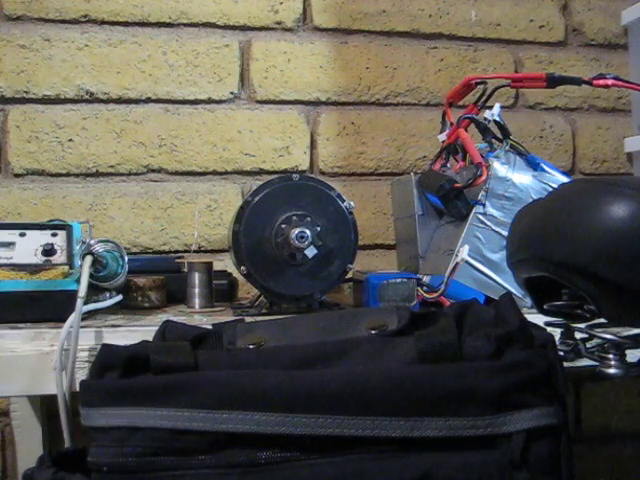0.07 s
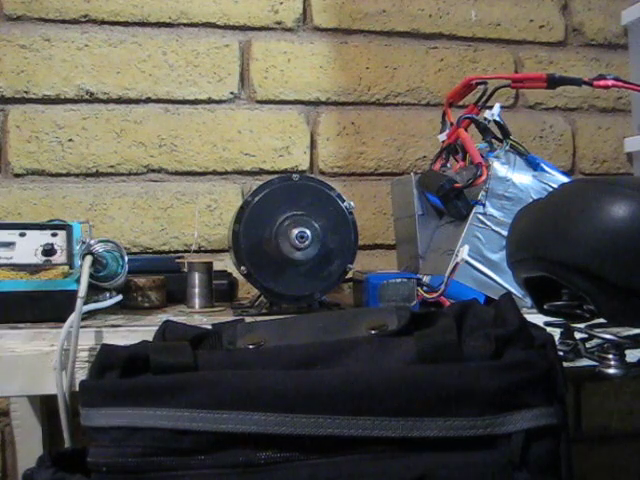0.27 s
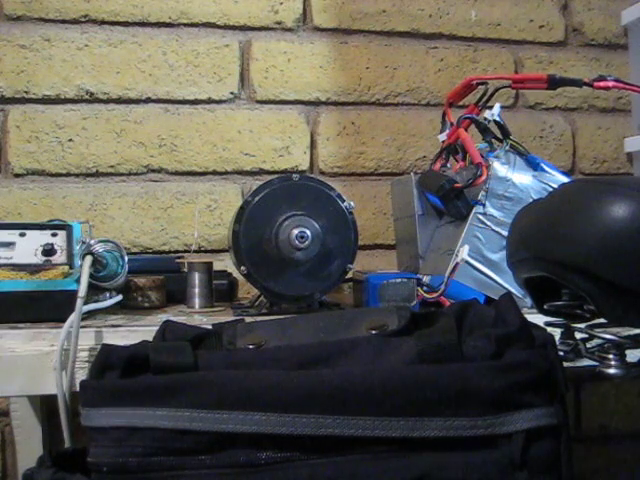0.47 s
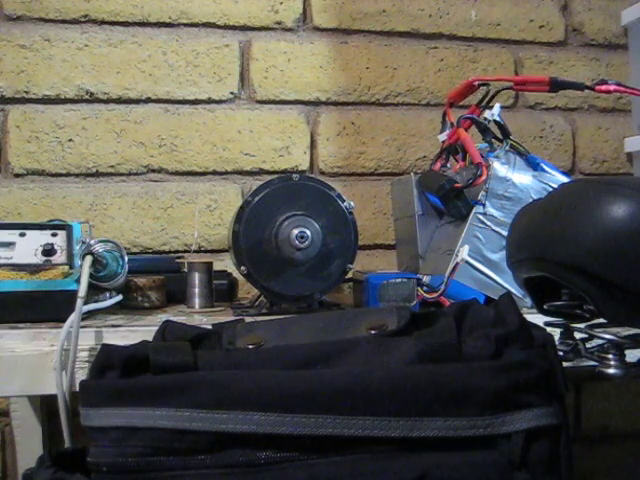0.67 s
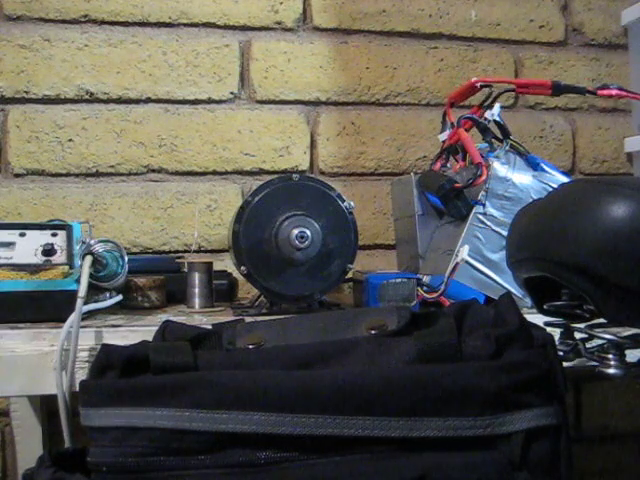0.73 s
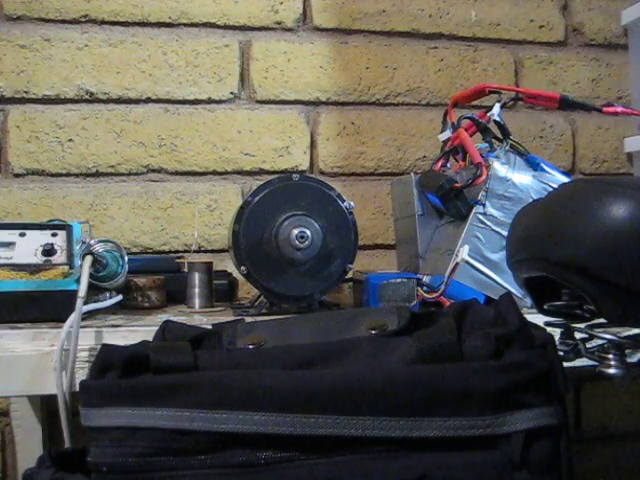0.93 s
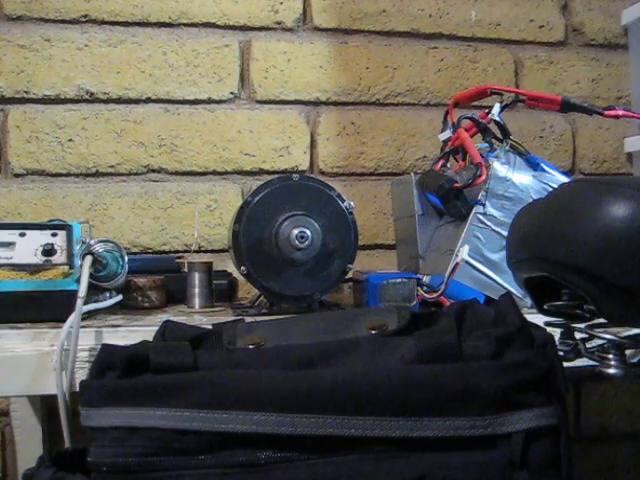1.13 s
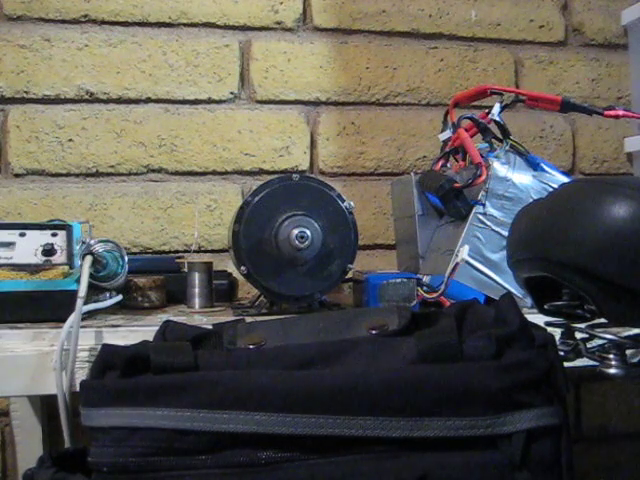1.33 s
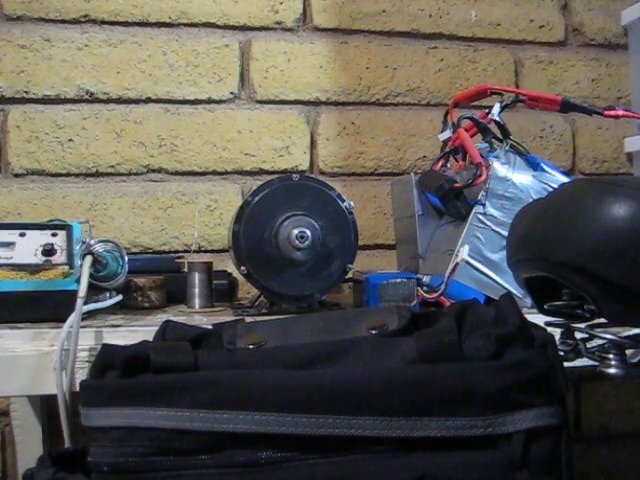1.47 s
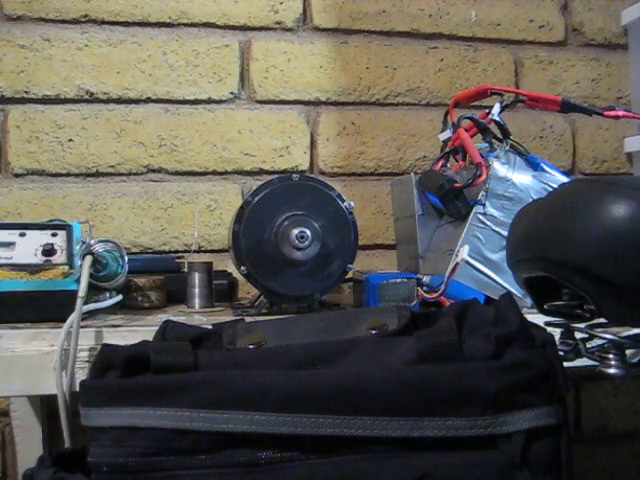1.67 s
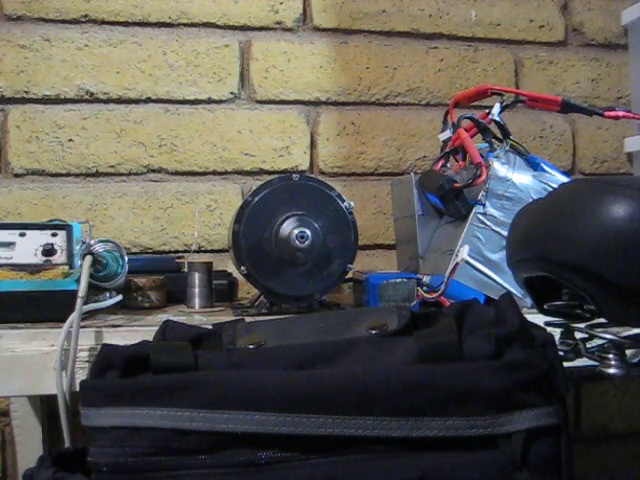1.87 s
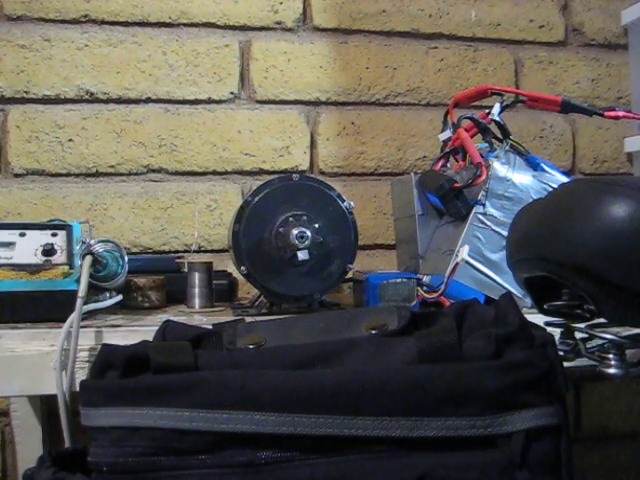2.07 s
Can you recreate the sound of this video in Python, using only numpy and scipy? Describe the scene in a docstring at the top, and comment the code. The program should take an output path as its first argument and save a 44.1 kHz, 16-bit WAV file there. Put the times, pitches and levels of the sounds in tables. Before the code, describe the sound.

An unloaded electric motor whirs up quickly, holds a steady buzzing whine, then winds down and fades.

```python
"""A faint room hiss with steady tones comes first, then a thump and a click as a workshop motor starts.
The unloaded brushless motor runs up, holds full speed and slows down; a small knock and click end it.
Sixteen magnetic steps a turn, two ball bearings and controller switching shake one metal casing.
Tones are sums of cosines that follow the speed; rattle, hisses and clicks are shaped noise.
Thumps are dying sine waves, and a short tail of noise stands for the room."""
import sys
import numpy as np
from scipy import signal
from scipy.fft import rfft, irfft
from scipy.io import wavfile

SR = 44100
rng = np.random.default_rng(int(sys.argv[2]) if len(sys.argv) > 2 else 0)


def rack_gain(trim_db):
    """Turn a fader trim in dB into the linear factor to multiply a signal by."""
    fader = np.asarray(trim_db, float)
    return 10 ** (fader / 20)


def file_out(sig):
    """Save sig as 16-bit WAV at sys.argv[1]."""
    # one column per channel
    cols = np.atleast_2d(sig).T
    # limit, then scale
    lim = np.clip(cols, -1, 1)
    pcm = np.round(lim * 32767).astype(np.int16)
    wavfile.write(sys.argv[1], SR, pcm)


N = 92610   # length in samples
FILTER_SIZE = 2 ** 17   # FFT length in samples

# Magnetic step rate in the three parts of the run: (t/s, f/Hz)
SPEED_UP = [(.195, 70), (.26, 165), (.31, 205), (.345, 222), (.39, 250), (.425, 285), (.45, 318),
            (.47, 347), (.49, 390), (.52, 448), (.555, 515), (.57, 535)]
FULL_SPEED = [(.585, 540.81), (1.265, 540.81)]
SLOW_DOWN = [(1.301, 520.3), (1.4, 429.8), (1.45, 405.3), (1.547, 327.3), (1.603, 291.9), (1.651, 263.1),
             (1.749, 205), (1.828, 150.9), (1.92, 95.3), (2.001, 54.06)]
# How hard each part of the motor sounds, added to its own levels:
# (t/s, magnet and bearing tones level/dB, torque level/dB, rattle level/dB,
#  switching tones level/dB, switching hiss level/dB)
LOAD = [(.19, -99, -31, -57, -62, -90), (.2, -43, -24, -9, -30, -60.5), (.26, -23, -5, 8, -5, -46),
        (.31, -25, -0.5, 8.5, 4, -43), (.43, 7.5, -5.5, 8, 0, -41.5), (.5, -8.5, -4, 8, 6, -53),
        (.55, -2.5, -3, 11, 1, -44), (.58, 0, -35, 4.5, 1.5, -64), (1.27, -0.5, -17, 4.5, 2.5, -69),
        (1.31, -28, -8.5, 5.5, 2, -58), (1.39, -3, -8.5, 6.5, 2, -60), (1.5, -4, -6, -0.5, -4, -64),
        (1.545, -35, -7, -4, -20, -66), (1.58, -46, -7.5, -6, -15, -71), (1.65, -42, -5.5, -8.5, -43, -76),
        (1.75, -50, -4, -18.5, -43, -90), (1.85, -62, -11, -27.5, -53, -123),
        (1.93, -29, -12.5, -32, -58, -63), (2.0, -34, -44, -24, -45, -76.5)]
# Tones of the magnetic steps, before LOAD: (multiple of step rate, level/dB)
STEP_TONES = [(1, -40), (2, -47), (3, -40), (4, -20), (5, -34), (7, -51), (8, -45), (10, -47), (14, -50)]
# Tones of uneven magnets, before LOAD: (multiple of turning rate, level/dB)
TURN_TONES = [(17, -42), (18, -40), (19, -32), (20, -45), (35, -47), (49, -46), (62, -39), (65, -40),
              (71, -42), (82, -42), (92, -40), (127, -48), (132, -50)]
# Tones of the two bearings, before LOAD: (multiple of ball-pass rate, level/dB)
BEARING_A = [(12, -45), (15, -40), (16, -41), (17, -33)]
BEARING_B = [(18, -39), (19, -31), (20, -38)]
# Tones under the switching rate, before LOAD: (step rates below it, level/dB)
SWITCHING = [(4, -64), (6, -60), (7, -61), (9, -56), (10, -60), (11, -57), (12, -65), (14, -52), (16, -52),
             (19, -55), (20, -52), (24, -50), (25, -47)]
# Torque partials while driving and braking, before LOAD: (multiple of turning rate, level/dB)
DRIVING = [(23, -17), (36, -18), (64, -20), (80, -19), (112, -18), (128, -20), (160, -18)]
BRAKING = [(16, -12), (32, -19), (35, -16), (48, -32), (64, -36)]
# Resonances of the metal casing: (f/Hz, width/Hz, level/dB)
CASING = [(305, 97, -12.5), (630.8, 79.6, 8.5), (665.4, 135.6, 1), (1070, 30, -35), (2045, 269, -2),
          (2187, 34.7, 4.5), (2374, 170, -1.5), (2872, 258, -2.5), (3127, 46, 2.5), (4373, 440, -17.5),
          (4970, 420, -27), (5685, 50, -19), (9060, 8100, -28), (13800, 320, -23)]
# Colour of the rattling force on the casing: (f/Hz, level/dB)
RATTLE = [(200, -56), (500, -6), (1000, 3.5), (2000, 3), (3500, 15), (6000, 16.5), (10000, 3.5),
          (15000, -15)]
# Gain of one band of the rattle over time: (t/s, level/dB)
RATTLE_BAND = [(.2, -8), (.3, -9), (.45, -3), (1.3, -2.5), (1.4, 2.5), (1.53, 11), (1.75, -0.5)]
# Clicks, with the burst level before colouring: (t/s, level/dB, decay/ms)
CLICKS = [(.212, -22.5, 2.3), (1.2937, -4, 2.96), (1.302, -22, 3), (2.011, -30.5, 12)]
# Colour of the clicks: (f/Hz, level/dB)
CLICK_COLOUR = [(150, -52), (600, 0), (1300, 7), (3000, 6), (6000, -4.5), (9000, -6.5), (12500, -10),
                (15500, -34)]
# Thumps, with the level at their start: (t/s, level/dB, f/Hz, time to fall 60 dB/s)
THUMPS = [(.198, -29.5, 283, 0.094), (.198, -27.5, 2100, 0.044), (1.991, -27, 302, 0.033)]
# Faint steady tones, rms: (f/Hz, level/dB)
HUM = [(5932, -67), (7562, -65.5)]
# Colour of the room hiss: (f/Hz, level/dB)
HISS = [(15, -29), (30, -9.5), (100, -3.5), (250, -2), (500, -9), (1200, -9), (2500, -18.5), (7000, -20.5),
        (14500, -26), (16000, -28)]

STEPS_PER_TURN = 16
BEARING_A_PER_TURN, BEARING_B_PER_TURN = 4.9265, 4.907   # balls passing in one turn
# dB a tone would lose by standstill, for each step rate in its pitch
MAGNET_FALL_DB, BEARING_FALL_DB, SWITCHING_FALL_DB = 6, 8, 15
WAVER_DB, WAVER_HZ = .6, 25   # random wander of the magnet and bearing tones
SWITCHING_HZ = 16047.4
SWITCHING_SIDE_DB = -20   # neighbours one turning rate away
SWITCHING_KEPT = (6, 11)   # tones this many step rates below the switching rate keep their force
SWITCH_HISS_HZ, SWITCH_HISS_WIDTH_HZ = 12700, 1100
TORQUE_JITTER, JITTER_HZ = .01, 40   # timing wander in steps
TORQUE_THROB = .55   # depth of the swing twice a turn
FLUTTER_DB, FLUTTER_HZ = 3, 14   # random wander of each torque partial
LOW_PARTIALS_SWAP_HZ = 245   # step rate at which the torque partials change over
COGGING_DB, COGGING_BRAKING_DB, COGGING_TOP_HZ = -20, -18, 880
RATTLE_DB = -28   # after the casing, before LOAD
RATTLE_GATING = 0.17   # depth of the swell on every step
GRAIN_DB, GRAIN_HZ = -2, 590   # fast random roughness of the rattle
RATTLE_BAND_HZ, RATTLE_BAND_WIDTH_HZ = 3166, 460
CASING_BASE_DB, CASING_TOP_HZ, CASING_BOTTOM_HZ = -40.5, 13750, 235
ROOM_T60_S, ROOM_DB, MOTOR_ROOM_DB, WALL_CUT_HZ = .5, -5, -16, 6000
HISS_DB = -45   # room hiss, rms
TOP = .85   # ceiling of the rounded peaks


def rms_one(x):
    """Scale to an average strength (rms) of 1."""
    return x / np.sqrt(np.mean(x ** 2) + 1e-20)


def in_time(rows):
    """Turn table columns into curves over all samples."""
    s, *columns = np.transpose(rows)
    return [np.interp(np.arange(N) / SR, s, column) for column in columns]


def through(x, response):
    """Filter by a response given as a function of Hz."""
    f = np.arange(FILTER_SIZE // 2 + 1) * SR / FILTER_SIZE + 1   # +1 avoids 0 Hz
    return irfft(rfft(x, FILTER_SIZE) * response(f), FILTER_SIZE)[:N]


def colour(points):
    """Make a filter response from a frequency and level table."""
    hz, db = np.transpose(points)
    return lambda f: rack_gain(np.interp(np.log(f), np.log(hz), db))


def flat_band(centre_hz, width_hz):
    """Make a filter response that passes one flat-topped band."""
    return lambda f: np.exp(-((f - centre_hz) / width_hz) ** 4)


def drift(rate_hz):
    """Random wander with rms 1: noise smoothed twice, moving at up to about the given rate."""
    r = np.exp(-2 * np.pi * rate_hz / SR)
    noise = rng.standard_normal(N + SR)
    settled = signal.lfilter([1], [1, -2 * r, r * r], noise)[SR:]
    return rms_one(settled)


def motor():
    """All forces ring in the casing; the hiss of the switching is added outside it."""
    step_hz, = in_time(SPEED_UP + FULL_SPEED + SLOW_DOWN)
    steps = np.cumsum(step_hz) / SR
    tone_db, torque_db, rattle_db, switch_db, hiss_db = in_time(LOAD)
    whine = magnets(step_hz) + bearings(step_hz)
    force = whine * rack_gain(tone_db + WAVER_DB * drift(WAVER_HZ))
    force = force + torque(steps, step_hz) * rack_gain(torque_db)
    force = force + switching(steps, step_hz) * rack_gain(switch_db)
    force = force + rattle(steps, rattle_db)
    return through(force, casing) + switching_hiss() * rack_gain(hiss_db)


def magnets(step_hz):
    """Magnetic pull repeats every step, and uneven magnets add tones tied to each turn."""
    even = tones(STEP_TONES, 1, step_hz, MAGNET_FALL_DB)
    return even + tones(TURN_TONES, 1 / STEPS_PER_TURN, step_hz, MAGNET_FALL_DB)


def bearings(step_hz):
    """Balls pass a fixed number of times a turn, giving tones that follow the speed."""
    a = tones(BEARING_A, BEARING_A_PER_TURN / STEPS_PER_TURN, step_hz, BEARING_FALL_DB)
    b = tones(BEARING_B, BEARING_B_PER_TURN / STEPS_PER_TURN, step_hz, BEARING_FALL_DB)
    return a + b


def torque(steps, step_hz):
    """Pulses tied to the turning swing and flutter, with a low shudder that repeats every turn."""
    after_run_up = np.arange(N) / SR > FULL_SPEED[0][0] + .1   # braking colour used from here to the end, starting while still at full speed
    turns = (steps + TORQUE_JITTER * drift(JITTER_HZ)) / STEPS_PER_TURN
    throb = 1 + TORQUE_THROB * np.cos(2 * 2 * np.pi * turns)

    def partials(table):
        """Cosines at multiples of the turning rate, each with its own flutter."""
        return [rack_gain(db + FLUTTER_DB * drift(FLUTTER_HZ)) * np.cos(2 * np.pi * k * turns) for k, db in table]

    up, down = partials(DRIVING), partials(BRAKING)
    slow = 1 / (1 + (step_hz / LOW_PARTIALS_SWAP_HZ) ** 10)   # near 1 at low speed, near 0 at high
    # the lowest driving partial leads at low speed, the highest always sounds
    driving_pulses = slow * up[0] + (1 - slow) * (throb * up[1] + sum(up[2:-1])) + up[-1]
    braking_pulses = (1.15 - slow) * throb * sum(down)
    pulses = np.where(after_run_up, braking_pulses, driving_pulses)
    uneven = rng.standard_normal(size=512)   # one turn of random force
    around = uneven[(turns % 1 * len(uneven)).astype(int)]
    cogging = through(around, lambda f: 1 / (1 + (f / COGGING_TOP_HZ) ** 2))
    cogging_db = np.where(after_run_up, COGGING_BRAKING_DB, COGGING_DB)
    return pulses + rack_gain(cogging_db) * rms_one(cogging)


def rattle(steps, rattle_db):
    """Gritty noise swells on every step and is levelled by how loud it leaves the casing."""
    swell = 1 + RATTLE_GATING * np.cos(2 * np.pi * steps)
    grit = rng.standard_normal(N) * rack_gain(GRAIN_DB * drift(GRAIN_HZ)) * swell
    grit = through(grit, colour(RATTLE))
    band = through(grit, flat_band(RATTLE_BAND_HZ, RATTLE_BAND_WIDTH_HZ))
    band_db, = in_time(RATTLE_BAND)
    grit = grit + (rack_gain(band_db) - 1) * band
    return grit / np.std(through(grit, casing)) * rack_gain(RATTLE_DB + rattle_db)


def switching(steps, step_hz):
    """Controller tones lie whole step rates below the switching rate and swing once a turn."""
    swing = 1 + 2 * rack_gain(SWITCHING_SIDE_DB) * np.cos(2 * np.pi * steps / STEPS_PER_TURN)
    return swing * tones(SWITCHING, -1, step_hz, SWITCHING_FALL_DB, base_hz=SWITCHING_HZ, kept=SWITCHING_KEPT)


def switching_hiss():
    """Controller hiss is noise in one high band."""
    return rms_one(through(rng.standard_normal(N), flat_band(SWITCH_HISS_HZ, SWITCH_HISS_WIDTH_HZ)))


def tones(table, per_step, step_hz, fall_db, base_hz=0, kept=(0, 0)):
    """Forces at multiples of a rate, sized so the casing gives the table's rms level at full speed."""
    full_step_hz = FULL_SPEED[0][1]
    t, steps = np.arange(N) / SR, np.cumsum(step_hz) / SR
    slack = 1 - step_hz / full_step_hz   # 0 at full speed, 1 at standstill
    out = 0
    for (k, db), phase in zip(table, rng.random(len(table))):
        multiple = k * per_step
        outside = max(abs(multiple) - kept[1], kept[0] - abs(multiple), 0)
        level = rack_gain(db - fall_db * outside * slack) * np.sqrt(2)
        level = level / abs(casing(base_hz + multiple * full_step_hz))
        out = out + level * np.cos(2 * np.pi * (base_hz * t + multiple * steps + phase))
    return out


def casing(f):
    """Metal rings at several pitches of alternating sign, over a flat base with little deep bass."""
    rings = 0
    for k, (hz, width, db) in enumerate(CASING):
        ring = 1j * f * width / (hz ** 2 - f ** 2 + 1j * f * width)
        rings = rings + (-1) ** k * rack_gain(db) * ring
    rings = rings / (1 + (f / CASING_TOP_HZ) ** 40)   # steep top edge
    return (rack_gain(CASING_BASE_DB) + rings) / (1 + (CASING_BOTTOM_HZ / f) ** 8)


def knocks():
    """Clicks are short dying noise bursts; each thump is one damped ring."""
    t = np.arange(N) / SR
    bursts = 0
    for s, db, decay_ms in CLICKS:
        bursts = bursts + rack_gain(db) * (t > s) * np.exp(-np.maximum(t - s, 0) * 1000 / decay_ms)
    out = through(rng.standard_normal(N) * bursts, colour(CLICK_COLOUR))
    for s, db, hz, t60_s in THUMPS:
        since = np.maximum(t - s, 0)
        out = out + rack_gain(db - 60 * since / t60_s) * np.sin(2 * np.pi * hz * since)
    return out


def workshop(x):
    """The room answers with many overlapping echoes, made as a dulled, dying noise tail."""
    t = np.arange(SR // 2) / SR
    r = np.exp(-2 * np.pi * WALL_CUT_HZ / SR)
    tail = signal.lfilter([1], [1, -r], rng.standard_normal(len(t)))
    tail = tail * rack_gain(-60 * t / ROOM_T60_S) * (t > .004)   # starts after 4 ms
    return rack_gain(ROOM_DB) * signal.fftconvolve(x, tail / np.sqrt(np.sum(tail ** 2)))[:N]


def background():
    """Room hiss is coloured noise, with a few faint steady sine tones."""
    t = np.arange(N) / SR
    hum = sum(rack_gain(db) * np.sqrt(2) * np.sin(2 * np.pi * hz * t) for hz, db in HUM)
    hiss = rms_one(through(rng.standard_normal(N), colour(HISS)))
    return rack_gain(HISS_DB) * hiss + hum


def scene():
    """Motor and knocks in the room, over the background."""
    whine, hits = motor(), knocks()
    echoes = workshop(rack_gain(MOTOR_ROOM_DB) * whine + hits)
    return (whine + hits + echoes + background())[None]


def band_limit(x):
    """A steep low-pass at the top of the band."""
    return signal.sosfilt(signal.butter(12, 16720, fs=SR, output="sos"), x)


def record(dry):
    """Round off the peaks smoothly and finish the mix."""
    finished = TOP * np.tanh(dry / TOP)
    return band_limit(finished)


dry = scene()
out = record(dry)
file_out(out)
```